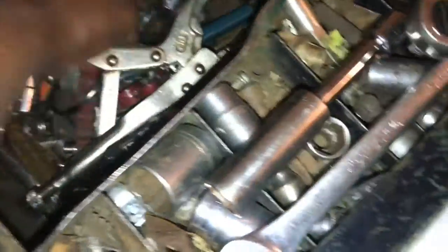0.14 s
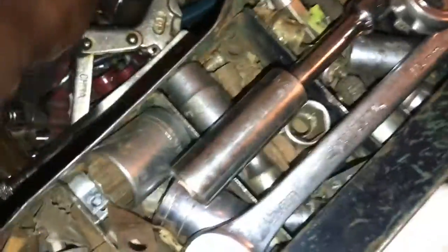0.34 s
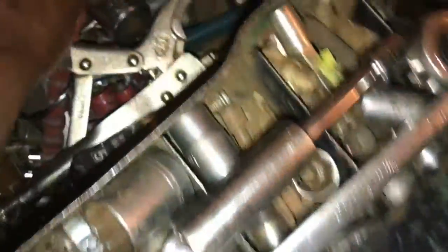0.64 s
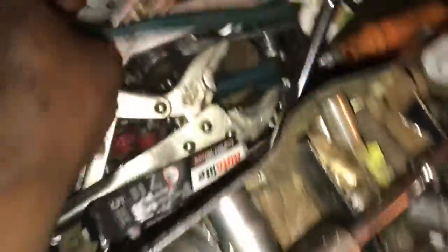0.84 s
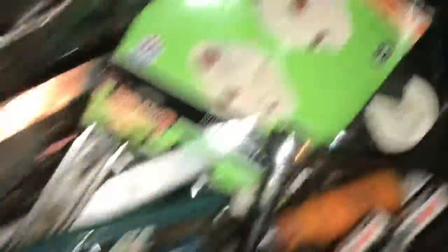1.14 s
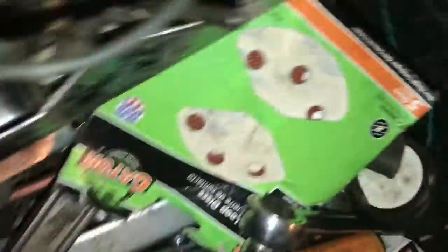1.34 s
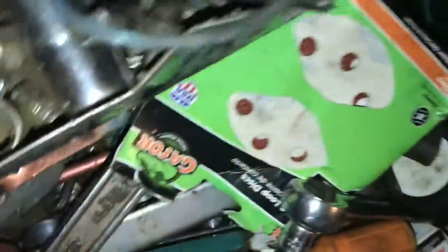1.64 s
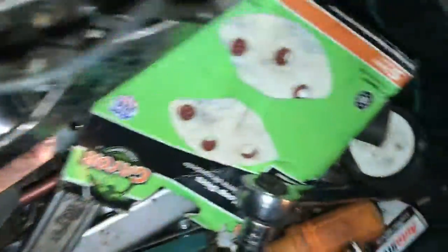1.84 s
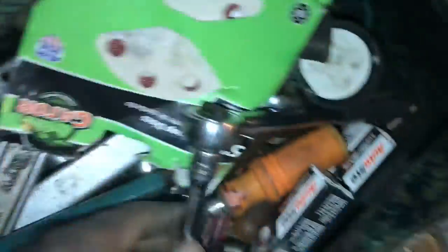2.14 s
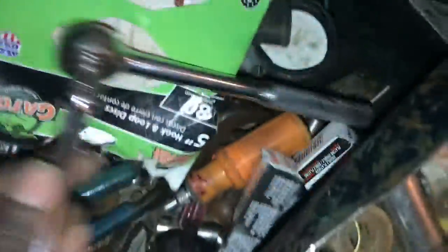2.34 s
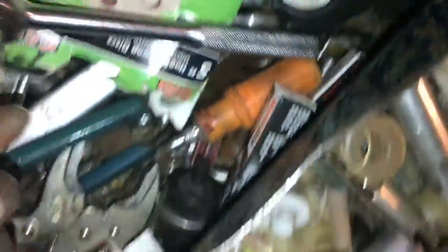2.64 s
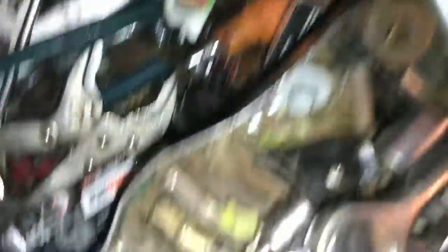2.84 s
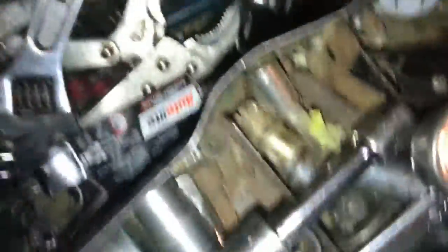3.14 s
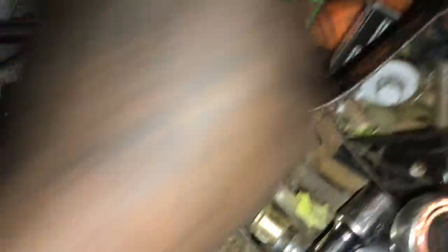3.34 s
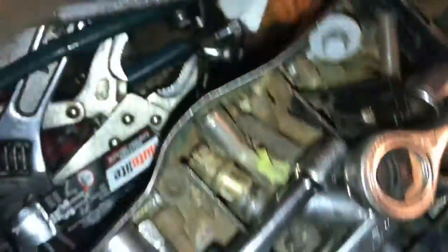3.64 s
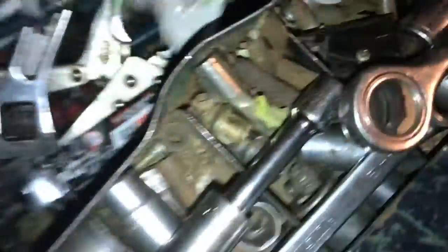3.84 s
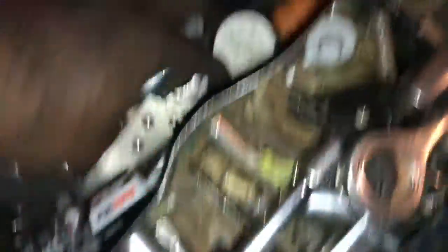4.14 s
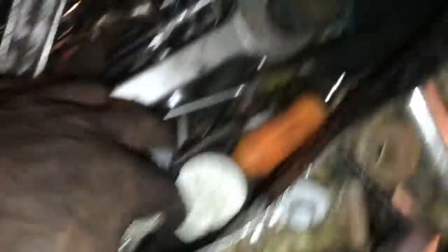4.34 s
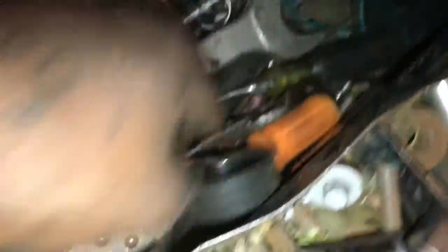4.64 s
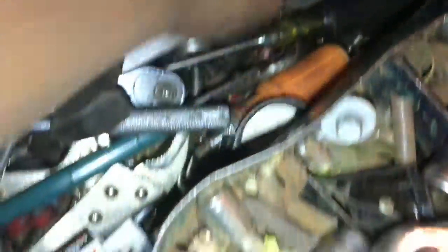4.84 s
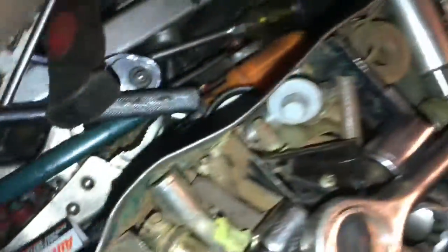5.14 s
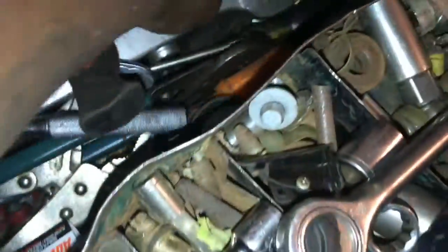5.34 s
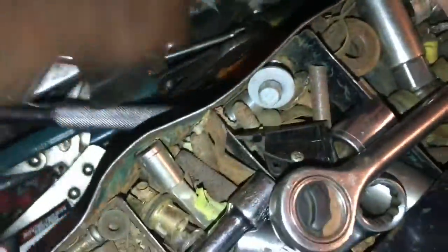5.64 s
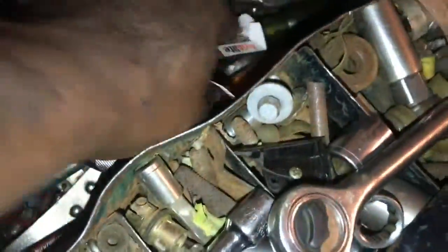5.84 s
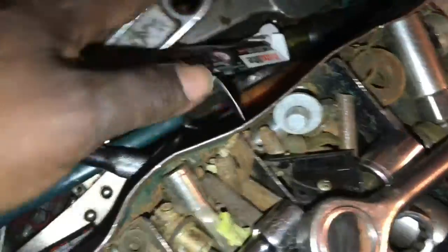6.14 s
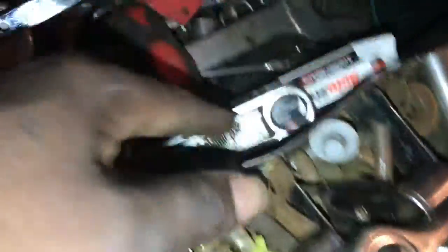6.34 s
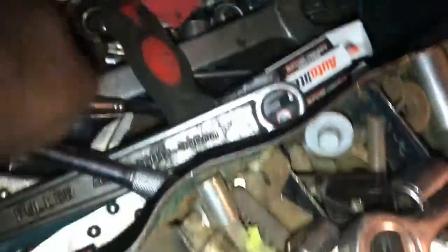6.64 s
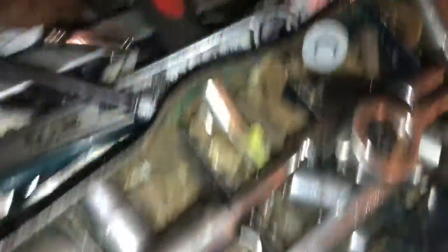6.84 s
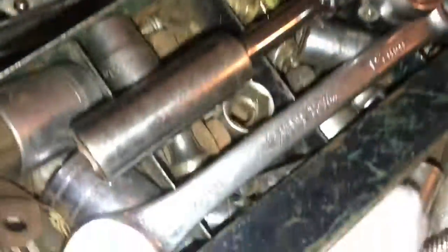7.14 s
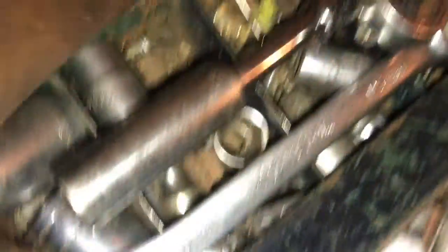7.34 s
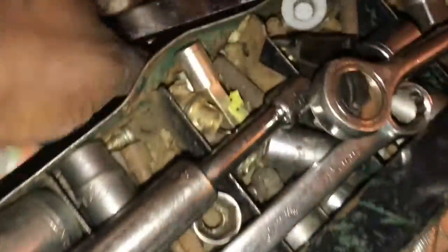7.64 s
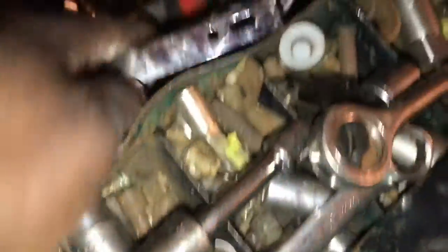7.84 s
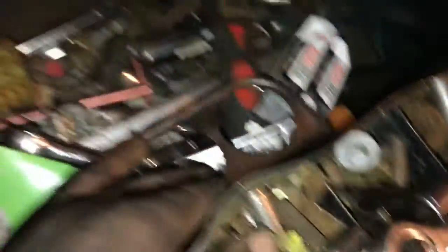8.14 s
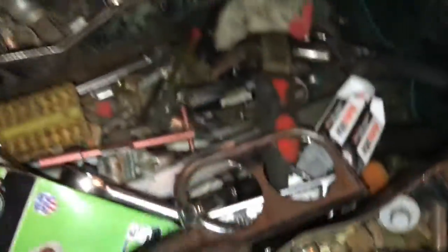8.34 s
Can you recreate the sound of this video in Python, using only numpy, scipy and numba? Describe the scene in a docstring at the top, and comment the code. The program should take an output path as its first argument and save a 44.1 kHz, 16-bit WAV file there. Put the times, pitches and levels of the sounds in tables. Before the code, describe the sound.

A hand rummages through steel sockets, pliers and wrenches in a toolbox tray, clinking, scraping and knocking, very close, with a quiet lull early on.

```python
"""A hand rummages through steel sockets, pliers and wrenches in a toolbox tray, close to a phone.
The moving heap is a crowd of small modal impacts over gritty noise; drags and thuds excite the tray's modes.
Separate knocks crack as noise bursts and ring as decaying sines. A pair of pliers rings freely, a thin steel
frame until a touch damps it, and one tool slides softly. Low outdoor air murmurs behind; loud peaks saturate."""
import sys
import numpy as np
from scipy import signal
from scipy.fft import rfft, irfft, next_fast_len
from scipy.io import wavfile
from scipy.ndimage import uniform_filter1d
from numba import njit

SR = 44100
rng = np.random.default_rng(int(sys.argv[2]) if len(sys.argv) > 2 else 0)


def put_to_file(sound):
    """Save the sound as 16-bit audio at rate SR, in the file named by the first command-line argument."""
    columns = np.atleast_2d(sound).T  # one column per channel
    safe = np.clip(columns, -1, 1)
    whole_steps = np.round(safe * 32767)
    wavfile.write(sys.argv[1], SR, whole_steps.astype(np.int16))


def boost(x):
    """Linear amplitude factor 10**(x/20) for a level x in decibels (scalar or array-like)."""
    u = np.asarray(x, float) / 20
    return 10 ** u


N = 374409  # length [samples]

# shoves of the hand through the heap:
# (time of full effort [s], build-up [s], hold [s], relative level [dB])
SHOVES = [(0.0, 0.052, 0.0045, -15.5), (0.236, 0.07, 0.031, -14.5), (0.433, 0.17, 0.065, -15),
          (0.963, 0.29, 0.035, -30), (2.3, 0.303, 0.122, -32), (2.557, 0.7, 0.45, -42.5),
          (3.038, 0.037, 0.012, -19.5), (3.311, 0.064, 0.081, -28.5), (3.71, 0.12, 0.0094, -28),
          (3.983, 0.284, 0.261, -22.5), (4.612, 0.13, 0.074, -29), (5.196, 0.099, 0.287, -24),
          (5.394, 0.2, 0.035, -15), (5.733, 0.208, 0.098, -21.5), (5.946, 0.13, 0.093, -23.5),
          (6.289, 0.051, 0.16, -27), (6.92, 0.12, 0.04, -15.5), (7.099, 0.19, 0.064, -30.5),
          (7.346, 0.13, 0.051, -19), (7.748, 0.2, 0.012, -28.5), (8.109, 0.1, 0.012, -27)]
# radiation of steel contacts: (frequency [Hz], relative spectral level [dB])
STEEL_COLOUR = [(240, -35.5), (400, -1), (3370, -2.5), (6050, -1), (16000, -11)]
# modes of the tray floor and walls: (frequency [Hz], relative level [dB], 60 dB decay time [s])
TRAY_MODES = [(169.4, -7.5, 0.16), (240.3, 3.5, 0.029), (293, 5.5, 0.037), (648, 1, 0.021),
              (1250, 3.5, 0.013)]
# spectrum of the outdoor air: (frequency [Hz], relative spectral level [dB])
AIR_COLOUR = [(15, -52), (25, -14.5), (55, 5), (170, 0.5), (500, -13), (16000, -54)]
# thuds of heavy tools on the tray: (time [s], relative level [dB], thump re that level [dB])
KNOCKS = [(0.25, -2.5, -11), (0.529, -6, -6), (2.145, -31, 3.5), (2.355, -18.5, -3), (2.608, -9.5, -17.5),
          (2.949, -19.5, 2), (3.108, -22.5, -6), (4.6836, -26, 6), (4.7541, -11, -6), (4.9496, -6.5, -15),
          (5.073, -30.5, 7), (5.89, -1.5, -7.5), (6.011, -7, -3.5), (6.7525, -18.5, 1)]
# further knocks, with a common thump and each a clear ring of its own: (time [s], relative level [dB], clear
# ring [Hz])
MORE_KNOCKS = [(0.2068, 3, 1496), (0.3993, 4.5, 5980), (0.4513, 1.5, 6100), (0.7446, -14.5, 8540),
               (0.7736, -5.5, 6520), (0.806, -17, 4940), (0.8925, 1.5, 6300), (0.949, -1, 6590),
               (0.9899, -1.5, 6070), (1.014, -12.5, 3590), (1.437, -41.5, 1430), (1.5255, -39, 2300),
               (2.109, -23, 1090), (2.214, -13, 6080), (2.834, 9.5, 2595), (2.9164, -2.5, 3346),
               (3.1045, 3, 6540), (3.135, 4.5, 5030), (3.161, -8.5, 3420), (3.2897, 6, 5940), (3.33, 2, 685),
               (3.383, -5.5, 5980), (3.44, -14.5, 1416), (3.504, -15, 3904), (3.669, -9.5, 1374),
               (3.844, -9, 1284), (3.9, -1.5, 1282), (3.974, 1.5, 6250), (3.987, -3, 7680), (4.035, -1.5, 12930),
               (4.085, 5, 8580), (4.115, 5.5, 5190), (4.173, 4, 11900), (4.556, -9, 1450), (4.9032, -7, 1290),
               (5.1052, -6.5, 2490), (5.145, -1.5, 3870), (5.231, -0.5, 7100), (5.254, -2.5, 8300),
               (5.3776, 6.5, 8250), (5.421, -1, 8240), (5.555, -8, 3880), (5.568, -9, 11450),
               (5.7259, 0.5, 6650), (5.7917, -4, 6230), (5.878, -4.5, 8520), (6.048, -8, 11270),
               (6.259, -7, 6440), (6.289, -23, 8200), (6.329, -2, 1502), (6.4694, 1.5, 3440),
               (6.5882, -11.5, 8550), (6.6862, -13, 1394), (6.701, -13.5, 6700), (6.8716, -6, 2730),
               (6.9283, -9, 6020), (6.943, 3.5, 13700), (6.982, -5, 4820), (7.1129, -9, 1316),
               (7.1928, -16.5, 6230), (7.267, -11.5, 8400), (7.3086, -7.5, 6240), (7.3402, -1.5, 6210),
               (7.363, 0.5, 11080), (7.387, -4.5, 14300), (7.405, -3.5, 4790), (7.431, 0.5, 6550),
               (7.557, -0.5, 7090), (7.6181, -6, 415), (7.725, -8.5, 12700), (7.9101, -13.5, 3340),
               (7.9784, -17, 1720), (8.1928, 4.5, 3240)]
# modes of the pliers: (frequency [Hz], relative level [dB])
PLIERS_MODES = [(3520, -6.5), (5240, -10.5), (6142, -10.5), (7090, -1.5), (8470, 2.5), (10450, -19),
                (11645, -6.5), (12530, -9), (14190, -26), (14870, -19)]
# blows on the pliers: (time [s], relative level [dB])
PLIERS_BLOWS = [(0.7442, -21), (0.8909, -9), (0.9517, -17), (0.9903, -28), (6.4692, -7)]
# clear modes of the frame: (frequency [Hz], relative level [dB])
FRAME_MODES = [(3257, 4), (5103, -4), (6315, 0.5), (7035, 3), (7265, -4), (8290, -1), (8646, -2.5),
               (10830, -3), (13347, -6), (14390, -5)]
# blows on the frame: (time [s], relative level [dB])
FRAME_BLOWS = [(4.298, -3.5), (4.325, 4), (8.1261, 2.5), (8.1896, 8.5), (8.2129, 7), (8.236, 4.5),
               (8.271, 6.5), (8.298, 0.5), (8.341, -2)]
# touches that damp the frame: (time [s])
FRAME_GRIPS_S = [4.43, 8.15, 8.42]

TOP_HZ = 16000
# rise over the build-up; fall once the hand lets go
BUILD_DB, SETTLE_DB_PER_S, TRAY_SETTLE_DB_PER_S = 24, 196.5, 157.5
REST_DB, TRAY_REST_DB = -80, -51.5  # floors of rattle and rumble with the hand barely touching
LINGER_DB, LINGER_DB_PER_S = -14.5, 49.5  # faint rustle of tools that keep shifting afterwards
# tray rumble re rattle; it drops once the tools are lifted off the tray
RUMBLE_DB, LIFTED_S, LIFTED_DB = 2, 7.6, -20
AIR_DB = -47.5
THUD_RING_HZ, MORE_KNOCKS_THUMP_DB = 1266, -23  # clear ring of a thud; common thump of the further knocks re their level
PLIERS_T60_S = 0.14
SLIDE_S, SLIDE_LENGTH_S, SLIDE_HZ = 1.93, 0.19, (1700, 2600)
SLIDE_DB = -42  # level of the slide's noise ahead of its band-pass


def colour(x, points):
    """Linear filtering: weights a noise spectrum by (Hz, dB) points and scales it to rms 1."""
    hz, db = np.transpose(points)
    n = next_fast_len(N)
    f = np.arange(n // 2 + 1) * SR / n + 1
    gain = boost(np.interp(np.log(f), np.log(hz), db))
    y = irfft(rfft(x, n) * gain, n)[:N]
    return y / y.std()


def band(x, lo_hz, hi_hz):
    """Band limitation: a Butterworth band-pass made from a second-order prototype."""
    return signal.sosfilt(signal.butter(2, [lo_hz, hi_hz], "band", fs=SR, output="sos"), x)


def bursts(s, db, t60):
    """Exponential decay: an envelope jumps at each moment and loses 60 dB in t60 seconds."""
    kicks = np.bincount(np.minimum(s * SR, N - 1).astype(int), boost(db), N)
    return signal.lfilter([1], [1, -np.exp(-np.log(1000) / (t60 * SR))], kicks)


@njit
def ring(n, start, hz, size, t60, grip, held_t60):
    """Damped free vibration: decaying sines, each taking the held decay after its grip moment."""
    out = np.zeros(n)
    for k in range(len(start)):
        z = size[k] + 0j
        turn = 2j * np.pi * hz[k] / SR
        free = np.exp(turn - np.log(1000) / (t60[k] * SR))
        held = np.exp(turn - np.log(1000) / (held_t60 * SR))
        for i in range(start[k], n):
            out[i] += z.imag
            z *= free if i < grip[k] else held
            if z.real ** 2 + z.imag ** 2 < 6e-8:  # inaudible
                break
    return out


def strike(s, db, hz, t60, grip_s=99., held_t60=.085):
    """Modal superposition: every mode of every blow rings; inputs broadcast to blows x modes."""
    s, db, hz, t60, grip_s = (a.ravel() for a in np.broadcast_arrays(s, db, hz, t60, grip_s))
    start = (s * SR).astype(int)
    hz = np.clip(hz, 20., .45 * SR)
    size = boost(db) * np.sign(rng.standard_normal(len(s)))  # random polarity
    return ring(N, start, hz, size, np.clip(t60, .002, .8), (grip_s * SR).astype(int), held_t60)


def steel_db(hz):
    """Radiation efficiency: how strongly steel sends out a mode at this pitch."""
    points_hz, db = np.transpose(STEEL_COLOUR)
    return np.interp(np.log(hz), np.log(points_hz), db)


def tray(push):
    """Forced resonance: a push drives the tray's low modes; it is too small to send out deep bass."""
    out = 0
    for hz, db, t60 in TRAY_MODES:
        pole = np.exp(2j * np.pi * hz / SR - np.log(1000) / (t60 * SR))
        out = out + boost(db) * signal.lfilter([1], [1, -pole], push).imag
    return band(out, 206.4, 5400)


def effort(now):
    """Dominance of the strongest drive: shoves build up, hold, settle and linger; gives rattle, rumble in dB."""
    s, build, hold, db = np.transpose(SHOVES)[:, :, None]
    rise = BUILD_DB * np.minimum(now - s, 0) / build
    after = np.maximum(now - s - hold, 0)
    fall = np.maximum(-SETTLE_DB_PER_S * after, LINGER_DB - LINGER_DB_PER_S * after)
    rattle = np.max(db + rise + fall, axis=0)
    tray_db = np.where(s < LIFTED_S, RUMBLE_DB, LIFTED_DB)
    rumble = np.max(db + tray_db + rise - TRAY_SETTLE_DB_PER_S * after, axis=0)
    return np.maximum(rattle, REST_DB), np.maximum(rumble, TRAY_REST_DB)


def stirring(count=1500):
    """Random impact excitation: sliding tools ring in a dense crowd, hiss with grit and drag on the tray."""
    t = np.arange(0, N, 64) / SR
    rattle_db, rumble_db = effort(t)
    s, size, odds, centre = rng.random((count, 4, 1)).transpose(1, 0, 2)
    pick, life = rng.random((count, 2, 6)).transpose(1, 0, 2)
    s = s * N / SR
    effort_db = np.interp(s, t, rattle_db)
    extra_db = -2.5 * np.log(1 - size)
    # the gentler the hand, the fewer tools tumble
    busy = (odds < (effort_db + 62) / 40)[:, 0]
    s, effort_db, extra_db, centre, pick, life = (
        a[busy] for a in (s, effort_db, extra_db, centre, pick, life))

    # each small impact rings six modes around a pitch of its own, most of them briefly
    hz = 900 * 16.0 ** centre * np.exp(1.2 * (pick - .5))
    mode_db = effort_db + extra_db - 1.5 - 8 * life + steel_db(hz)
    clinks = strike(s, mode_db, hz, 0.017 * np.exp(2.25 * life ** 2))

    # light contacts tick in the treble, heavy ones knock lower
    now = np.arange(N) / SR
    steel = colour(rng.standard_normal(N), STEEL_COLOUR)
    low = band(steel, 400, 3990)
    light = uniform_filter1d(bursts(s[::3, 0], extra_db[::3, 0] + 1.5, 0.026), size=130)
    heavy = uniform_filter1d(bursts(s[1::3, 0], extra_db[1::3, 0] + 3.5, 0.036), size=300)
    ticks = light * (steel - low) + heavy * low
    # scraping stays duller than the ticks
    scrape = boost(-10.0) * low + boost(-8) * steel
    grit = boost(np.interp(now, t, rattle_db)) * (scrape + ticks)

    jolts = .5 + bursts(s[::5, 0], extra_db[::5, 0] - 0.5, 0.044)
    drag = boost(np.interp(now, t, rumble_db) - 25.5) * jolts
    return clinks + grit + tray(drag * rng.standard_normal(N))


def outdoor_air():
    """Stationary broadband noise: a steady low murmur of outdoor air."""
    return boost(AIR_DB) * colour(rng.standard_normal(N), AIR_COLOUR)


def knocks():
    """Impulsive excitation: a contact cracks, bounces, rings clear and chance modes and pushes the tray."""
    thuds = [row + (THUD_RING_HZ,) for row in KNOCKS]
    clinks = [(s, db, MORE_KNOCKS_THUMP_DB, hz) for s, db, hz in MORE_KNOCKS]
    s, db, thump_db, hz = np.transpose(thuds + clinks)
    thump_db = thump_db + np.where(s < LIFTED_S, 0, LIFTED_DB / 2)
    steel = colour(rng.standard_normal(N), STEEL_COLOUR)

    # small hard parts ring high and crack brightly, heavy ones are dull
    edge_db = db + 4.0 * np.log2(hz / 7200.0)
    bounce_s = s + 0.025 * rng.random(len(s))  # each tool touches down a second time
    touches = bursts(s, db - 15.0, 0.031) + bursts(bounce_s, db - 20.0, 0.082)
    body = band(steel, 2400, 9300) * uniform_filter1d(touches, size=90)
    edge = band(steel, 6700, TOP_HZ) * uniform_filter1d(bursts(s, edge_db - 14.0, 0.05), size=90)
    dull = band(rng.standard_normal(N), 460, 1466) * bursts(s, db + thump_db + 8.0, 0.22)

    # 24 chance modes per knock: draws for level, pitch and decay time
    level, pitch, life = rng.standard_normal((len(s), 24, 3)).transpose(2, 0, 1)
    modes_t60 = .065 * np.exp(.4 * np.clip(life, -2, 1.6))
    modes_hz = np.clip(np.sqrt(hz[:, None] * 8000.) * np.exp(.65 * pitch), 900., TOP_HZ)
    modes_db = db[:, None] - 21.5 + 3 * level - 2 * life + steel_db(modes_hz) / 2
    others = strike(s[:, None], modes_db, modes_hz, modes_t60)
    clear = strike(s, db - 9.5, hz, 0.049)
    push = rng.standard_normal(N) * bursts(s, db + thump_db - 22.5, 0.07)
    return body + edge + dull + others + clear + tray(push)


def tool(blows, modes, grips_s, share_db, spot_db=5.0, drift=0.001):
    """Dependence on the striking point: each blow reweights the modes and slightly shifts their pitch."""
    s, db = np.transpose(blows)[:, :, None]
    hz, mode_db, t60 = np.transpose(modes)
    grips = np.append(grips_s, 99.)  # 99 s: never touched
    next_grip_s = grips[np.searchsorted(grips, s)]
    spot = spot_db * rng.standard_normal((len(s), len(hz)))
    return strike(s, db + share_db + mode_db + spot, hz * (1 + spot * drift / 2), t60, next_grip_s)


def pliers():
    """Free modal vibration: the struck pliers ring out undisturbed."""
    modes = [mode + (PLIERS_T60_S,) for mode in PLIERS_MODES]
    return tool(PLIERS_BLOWS, modes, [], -11.0)


def slide():
    """Friction noise: a tool drags softly over the tray under a half-sine swell."""
    progress = np.clip((np.arange(N) / SR - SLIDE_S) / SLIDE_LENGTH_S, 0, 1)
    return boost(SLIDE_DB) * np.sin(np.pi * progress) * band(rng.standard_normal(N), *SLIDE_HZ)


def frame(count=170):
    """High modal density: thin steel has weak modes among its clear ones and chatters after each blow."""
    pick, weight, life = rng.random((count, 3)).T
    crowd = np.transpose([700 + 15200 * pick, -6 - 10 * weight - 8 * (1 - pick) ** 3])
    hz, db = np.vstack([FRAME_MODES, crowd]).T
    t60 = np.append(np.full(len(FRAME_MODES), 0.285), 0.095 + 0.19 * life)
    modes = np.transpose([hz, db, t60])
    s, blow_db = np.transpose(FRAME_BLOWS)[:, :, None]
    late = 0.041 * rng.random((len(s), 3))  # three weaker touches follow each blow
    chatter = np.transpose([(s + late).ravel(), (blow_db - 6.5 + 0 * late).ravel()])
    blows = np.vstack([FRAME_BLOWS, chatter])
    return band(tool(blows, modes, FRAME_GRIPS_S, -30.0, spot_db=4.5), 460, TOP_HZ)


def scene():
    """Linear superposition: the sounds of the tools and tray add to the outdoor air."""
    near = stirring() + knocks() + pliers() + slide() + frame()
    return (near + outdoor_air())[None]


def roll_off(x):
    """The treble ends steeply here."""
    return signal.sosfilt(signal.butter(12, 16470, fs=SR, output="sos"), x)


def record(dry):
    """Saturation and band limitation: the phone adds faint hiss, rounds the loudest peaks and cuts the top."""
    x = np.tanh(dry + boost(-70.0) * rng.standard_normal(N))
    x = signal.sosfilt(signal.ellip(8, .2, 70, TOP_HZ, fs=SR, output="sos"), x)
    return roll_off(x)


dry = scene()
out = record(dry)
put_to_file(out)
```